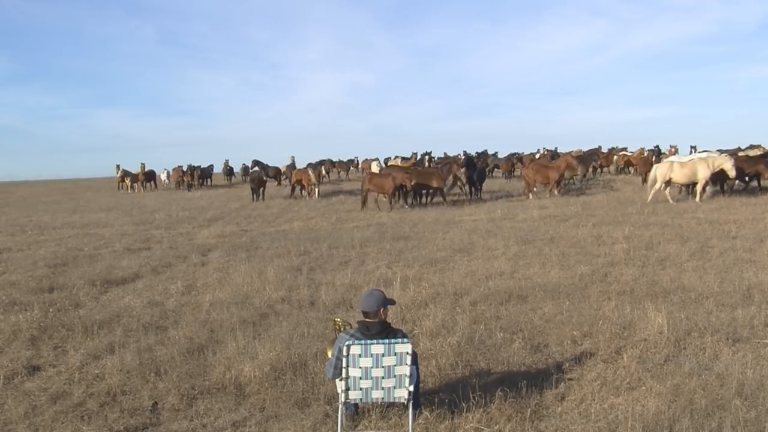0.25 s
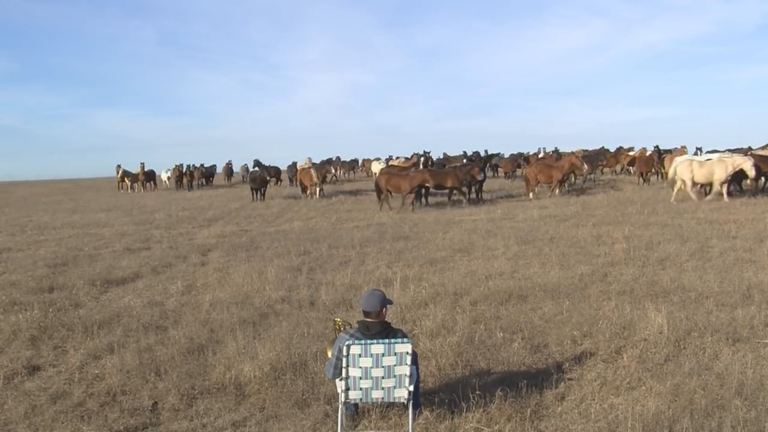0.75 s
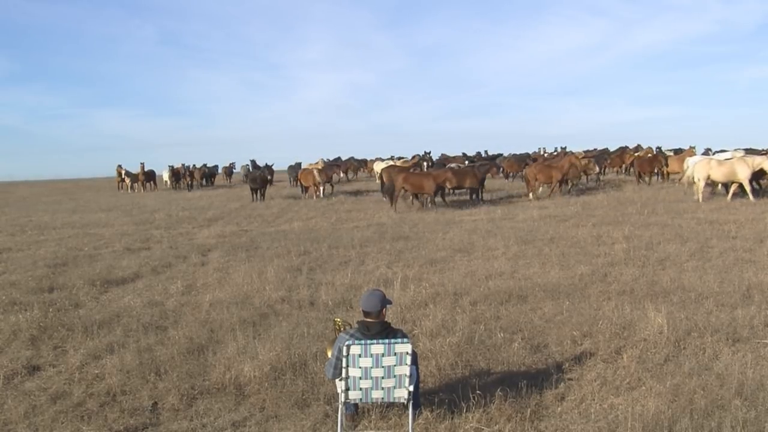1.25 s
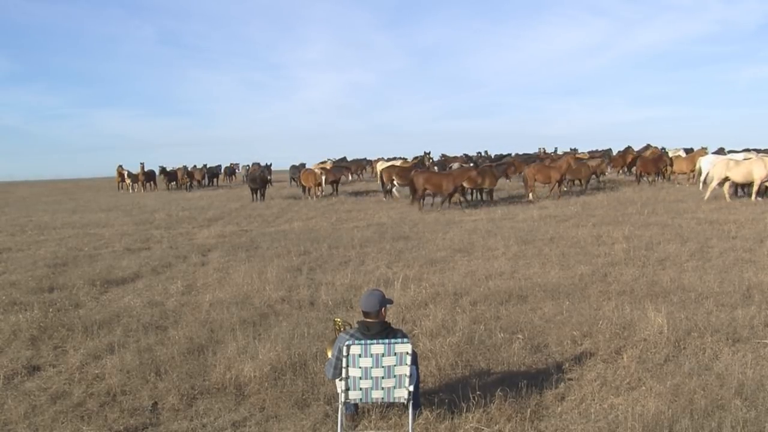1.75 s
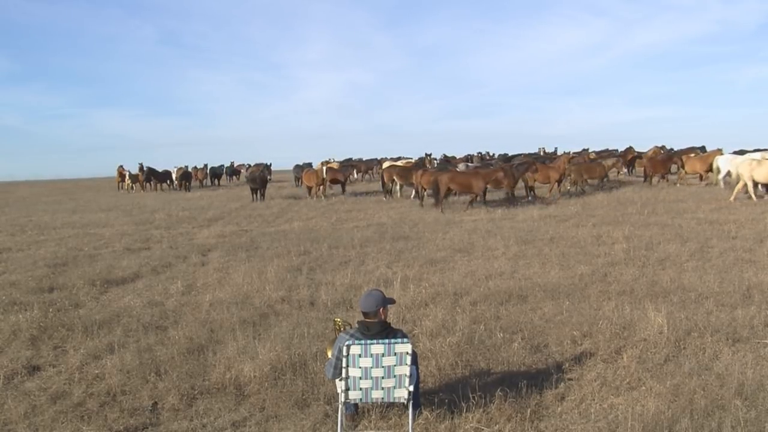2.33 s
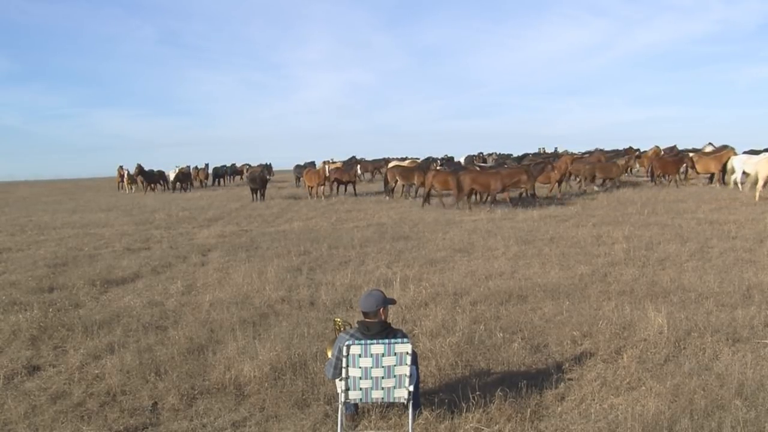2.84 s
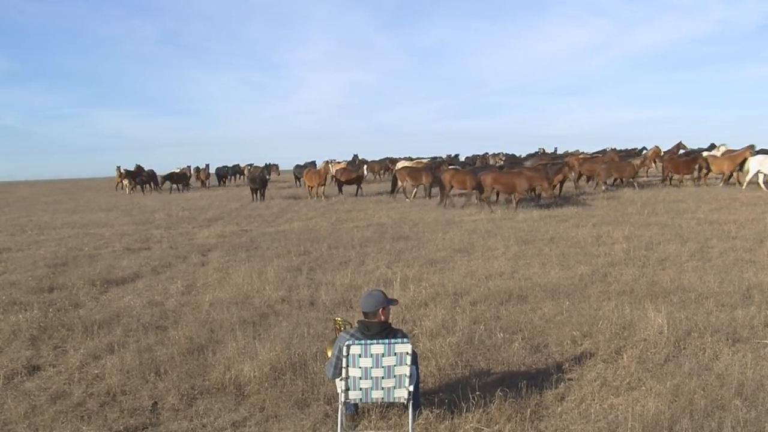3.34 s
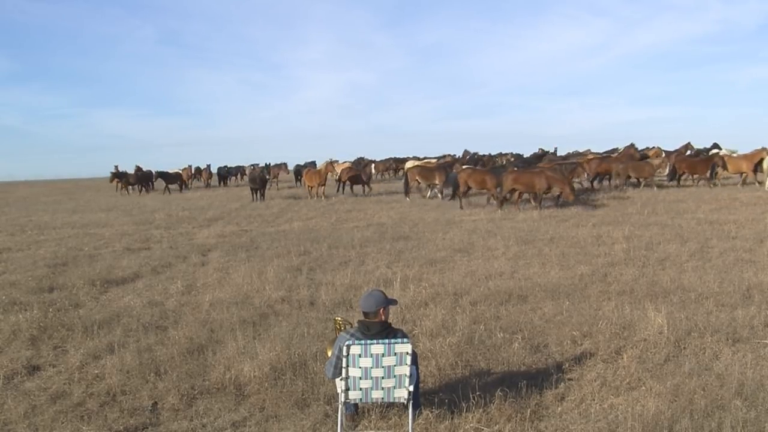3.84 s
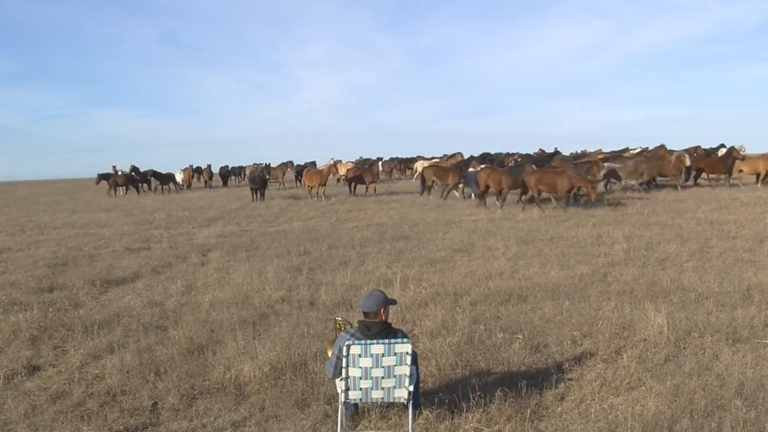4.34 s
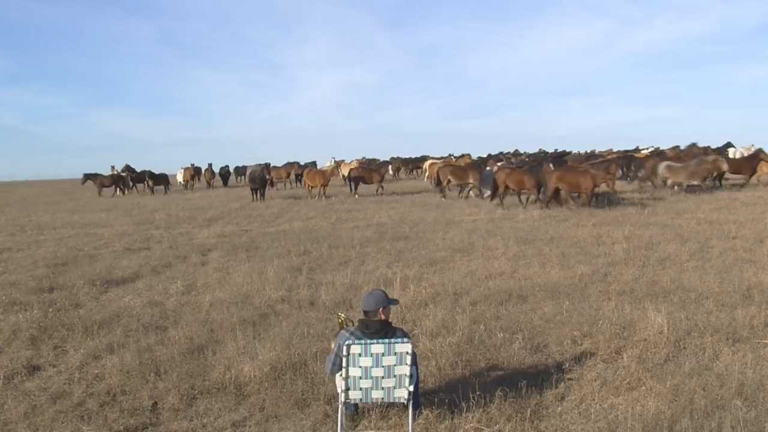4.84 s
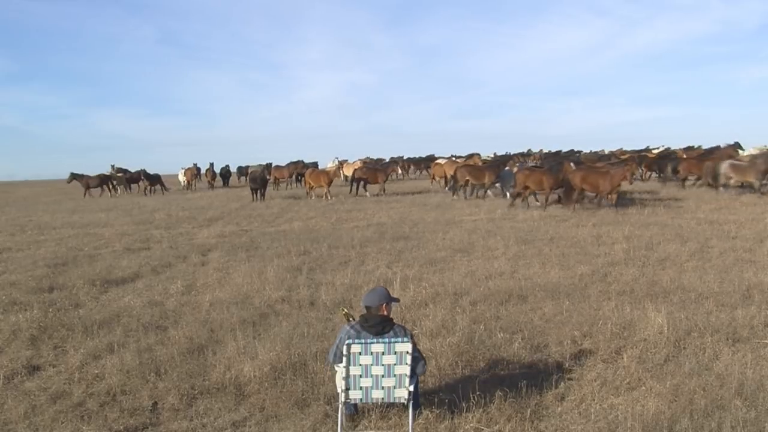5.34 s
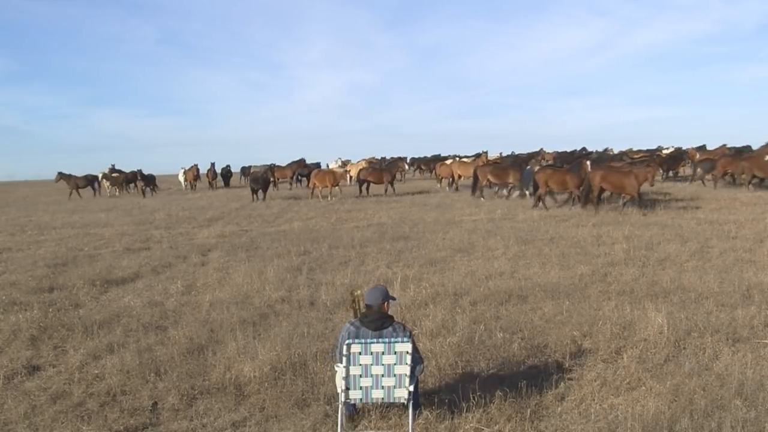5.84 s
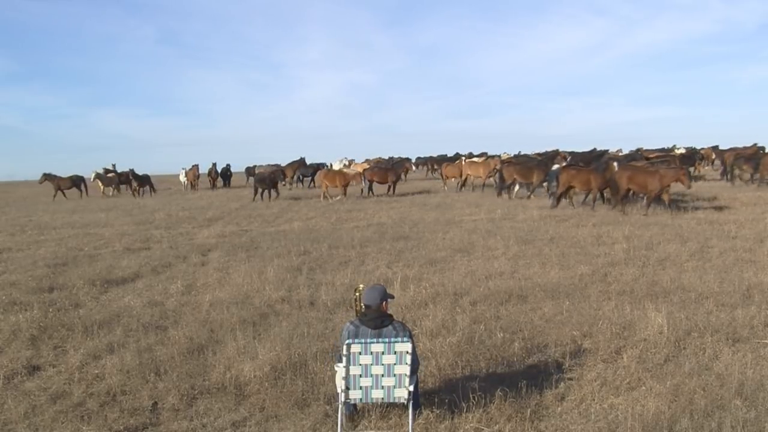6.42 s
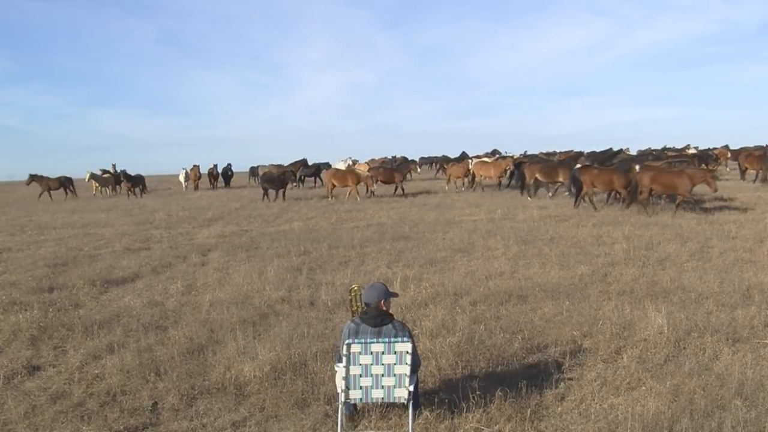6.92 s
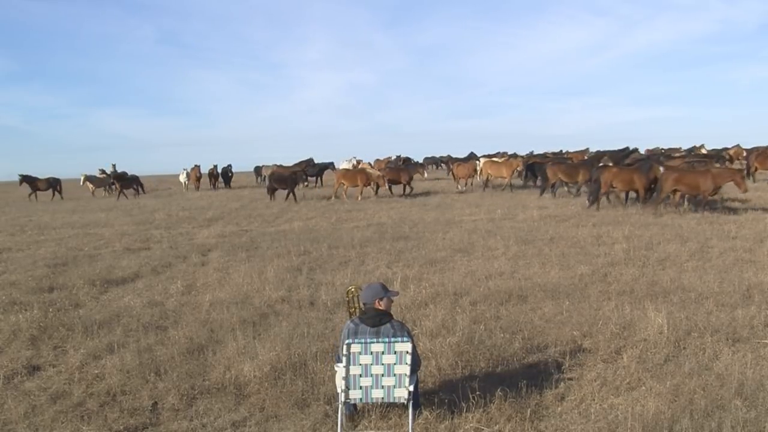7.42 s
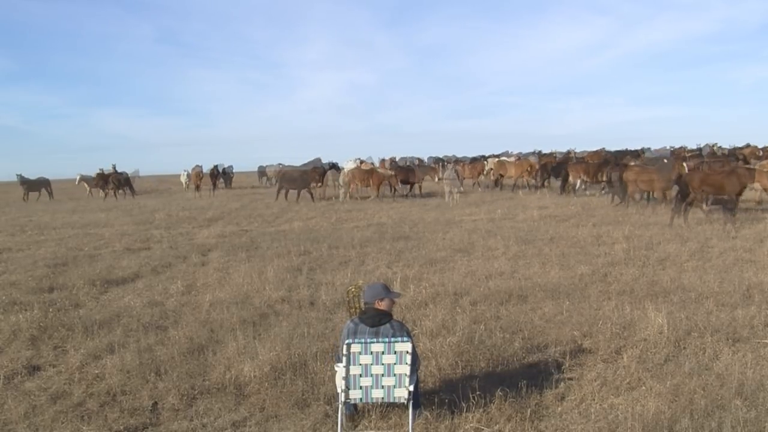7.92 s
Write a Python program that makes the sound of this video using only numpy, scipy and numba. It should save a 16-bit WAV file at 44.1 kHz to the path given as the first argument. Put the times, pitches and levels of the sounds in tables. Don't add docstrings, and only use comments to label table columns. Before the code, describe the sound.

A continuous dry swish of legs through grass, swelling and easing as a herd passes. Low wind thumps strike the microphone in the first three seconds. Far horses squeal and whinny in thin, shaky falsetto, then one near horse snorts hard, its nostrils flapping rapidly with wet, airy pops. Fainter flutters answer from farther off. Muffled hooves touch soft earth, stalks snap, and gusts come back last. Dry open air, nearly mono with slight width.

```python
import sys
import numpy as np
from scipy import signal
from scipy.fft import rfft, irfft, next_fast_len
from scipy.io import wavfile
from scipy.ndimage import uniform_filter1d
from numba import njit

SR = 44100
rng = np.random.default_rng(int(sys.argv[2]) if len(sys.argv) > 2 else 0)


def to_wav(sig):
    pcm = np.clip(np.atleast_2d(sig), -1, 1) * 32767
    pcm = np.round(pcm).astype(np.int16)
    wavfile.write(sys.argv[1], SR, pcm.T)


def magnitude_from_level(level_db):
    exponent = np.asarray(level_db, float) / 20
    return 10 ** exponent


N = 360297
T = np.arange(N) / SR


def level(x, db=0):
    return x * magnitude_from_level(db) / np.sqrt(np.mean(x ** 2))


def curves(rows):
    s, *columns = np.transpose(rows)
    return [np.interp(T, s, c) for c in columns]


@njit
def svf(x, warp, damp):
    y, b, l = np.empty(len(x)), 0., 0.
    for i in range(len(x)):
        g, k = warp[i], damp[i]
        v = (b + g * (x[i] - l)) / (1 + g * (g + k))
        b, l, y[i] = 2 * v - b, l + 2 * g * v, k * v
    return y


def band(x, hz, width_hz):
    warp = np.tan(np.pi * hz / SR) + 0 * x
    damp = width_hz / hz + 0 * x
    return svf(svf(x, warp, damp), warp, damp)


def walk(rate):
    k = int(SR / rate)
    steps = np.repeat(rng.standard_normal(N // k + 1), k)
    return 1.3 * uniform_filter1d(uniform_filter1d(steps, k), k)[:N]


def add(out, s, x):
    i = int(s * SR)
    out[i:i + len(x)] += x[:N - i]


def blip(db, hz, rise_s, fall_s, glide=0):
    t = np.arange(4096 if fall_s > .002 else 768) / SR
    shape = (1 - np.exp(-t / rise_s)) ** 2 * np.exp(-t / fall_s)
    return magnitude_from_level(db) * shape / shape.max() * np.sin(2 * np.pi * hz * t * (1 + glide * t / 2))


# start_s, length_s, level_db, centre_hz
GUSTS = [(0, 0.052, -48.5, 298), (0.205, 0.018, -43, 516), (0.592, 0.096, -47.5, 460),
         (0.692, 0.034, -34.5, 570), (0.766, 0.018, -35, 560), (0.783, 0.05, -41, 447),
         (0.837, 0.024, -41, 450), (0.931, 0.038, -44, 460), (1.008, 0.014, -41, 620),
         (1.023, 0.02, -42, 660), (1.097, 0.011, -36, 634), (1.107, 0.035, -35.5, 620),
         (1.191, 0.015, -46, 656), (1.142, 0.036, -48, 665), (1.242, 0.035, -45, 530),
         (1.286, 0.019, -50, 590), (1.444, 0.031, -49, 270), (1.476, 0.025, -49, 543),
         (1.734, 0.036, -46, 387), (1.768, 0.043, -38, 430), (1.843, 0.017, -52.5, 283),
         (1.912, 0.017, -49, 250), (1.958, 0.018, -51, 267), (2.006, 0.011, -36, 434),
         (2.017, 0.023, -39, 515), (2.219, 0.035, -46.5, 333), (2.354, 0.019, -60, 415),
         (2.499, 0.027, -59, 340), (2.534, 0.024, -42.5, 490), (2.568, 0.031, -47, 476),
         (2.594, 0.052, -42.5, 324), (2.65, 0.045, -43.5, 382), (2.768, 0.0083, -50.5, 650),
         (7.63, 0.065, -57.5, 300), (7.678, 0.075, -59, 300), (7.782, 0.032, -49.5, 398),
         (7.813, 0.046, -46, 397), (7.85, 0.081, -39.5, 376), (7.967, 0.022, -58, 500),
         (7.988, 0.038, -37, 450), (7.999, 0.044, -42.5, 640), (8.027, 0.051, -34, 554),
         (8.073, 0.022, -55, 500)]
# start_s, peak_db, centre_hz
THUMPS = [(0.688, -36, 724), (0.7, -33, 470), (0.77, -32, 563), (0.84, -38, 453), (0.597, -40, 700),
          (0.961, -43, 579), (1.012, -40, 514), (1.037, -34, 710), (1.097, -33, 620), (1.115, -30.5, 735),
          (1.196, -44, 695), (1.288, -42, 625), (1.761, -37, 340), (2.004, -33.5, 380), (2.016, -37, 610),
          (2.025, -35, 447), (1.745, -43, 533), (1.782, -37, 520), (2.242, -41.5, 456), (2.538, -40, 670),
          (2.653, -38, 300), (2.588, -37, 384), (7.836, -40, 345), (7.893, -37, 400), (7.985, -35, 390),
          (8.019, -37, 706), (8.043, -28, 526), (8.058, -29, 630)]
# time_s, rumble_db
BREEZE = [(0.0, -72), (0.45, -67), (0.86, -61), (1.14, -64), (1.5, -75.5), (1.77, -81), (1.91, -67),
          (2.32, -83), (2.6, -77.5), (2.98, -76.5), (3.21, -90.5), (4.1, -83.5), (4.4, -76.5), (4.9, -75.5),
          (5.5, -89), (7.4, -89.5), (7.9, -73), (8.17, -64.5)]


def wind():
    gain, hz = np.zeros(N), np.full(N, 400.)
    for s, length_s, db, centre_hz in GUSTS:
        arch = np.sin(np.linspace(0, np.pi, int(length_s * SR))) ** 0.38
        add(gain, s, magnitude_from_level(db - 7.5) * arch)
        hz[int(s * SR):] = centre_hz
    eddies = rng.standard_normal(N) * magnitude_from_level(2.2 * walk(260))
    edges = signal.butter(5, [170, 880], "band", fs=SR, output="sos")
    bursts = signal.sosfilt(edges, band(eddies, hz, 800))

    thumps = np.zeros(N)
    for s, db, centre_hz in THUMPS:
        add(thumps, s, blip(db - 3, centre_hz, .0005, .0028))

    rumble = level(band(rng.standard_normal(N) * magnitude_from_level(2.0 * walk(25)), 184, 237))
    sway = level(band(rng.standard_normal(N) * magnitude_from_level(2.0 * walk(15)), 49, 74))
    breeze_db = curves(BREEZE)[0]
    return level(bursts) * gain + thumps + magnitude_from_level(breeze_db + 6) * rumble + magnitude_from_level(1.2 * breeze_db + 11) * sway


# time_s, rustle_db
GRASS = [
    (0, -55.5),
    (.5, -56.5),
    (1.5, -54.5),
    (2.9, -56),
    (3.6, -52.5),
    (4.1, -52),
    (5.2, -51.5),
    (6, -53),
    (6.9, -54.5),
    (8.17, -55.5),
]
# frequency_hz, density_db (per Hz)
GRASS_COLOUR = [(150, -10), (250, -27.5), (413, -20), (620, -13.5), (850, -11.5), (1000, -9.5),
                (1450, -0.5), (1850, 0.5), (2600, -7), (4960, -16.5), (6210, -22), (8470, -19.5),
                (10200, -26.5), (12400, -26), (15500, -31)]
# time_s, swell_db, treble_swell_db
SWISHES = [(.25, 2.5, 3), (.62, 0.5, 1.5), (.75, 2.5, 0), (1.08, 1, 1), (1.38, 1, 0), (2.08, 1.5, 4.5),
           (2.5, 1, 2.5), (2.75, 1, 3), (3.1, 0.5, 4), (3.38, 3.5, 5), (5.33, 2.5, 1), (5.67, -1, 0.5),
           (5.82, 2.5, 1), (5.97, 0, 3), (6.3, 1.5, 2), (6.67, 4, 2.5), (7.1, 0.5, 2), (7.42, 0, 1),
           (7.67, 2.5, 0), (7.8, 1, 2.5), (8.04, 3, 2)]


def grass():
    swish_s, treble_below_db, wash_below_db = 0.093, -10.5, -17.5
    near_db = curves(GRASS)[0]
    swells = sum(np.outer(rise_db, np.exp(-((T - s) / swish_s) ** 2)) for s, *rise_db in SWISHES)
    rustle_db = near_db + swells[0]
    treble_db = treble_below_db + swells[1] - swells[0]

    colour_hz, colour_db = np.transpose(GRASS_COLOUR)
    size = next_fast_len(N)
    octave = np.log2(np.arange(1, size // 2 + 2) * SR / size)
    steps = walk(15)
    stalks = rfft(rng.standard_normal(N) * magnitude_from_level(0.82 * walk(400)), size)
    stalks *= magnitude_from_level(np.interp(octave, np.log2(colour_hz), colour_db, left=-90))
    dull, middle, treble = np.zeros(N), np.zeros(N), np.zeros(N)
    for hz in 210 * 2 ** np.arange(0, 6.6, .5):
        slice_ = np.clip(1 - 2 * abs(octave - np.log2(hz)), 0, 1)
        part = irfft(stalks * slice_, size)[:N] * magnitude_from_level(0.5 * steps + 0.4 * walk(15))
        if hz < 1000:
            dull += part
        elif hz < 3500:
            middle += part
        else:
            treble += part

    rustle = magnitude_from_level(rustle_db) * (level(middle, -1.54) + magnitude_from_level(treble_db) * level(treble, -2.24))
    wash = np.hypot(magnitude_from_level(near_db + wash_below_db), magnitude_from_level(curves(BREEZE)[0])) * level(dull, 0.64)
    return rustle + wash


# start_s, peak_db, pitch_hz
STALKS = [(0.055, -43.5, 1380), (0.189, -43, 2100), (0.2244, -53, 1520), (2.7666, -36.5, 1550),
          (3.0837, -43, 1510), (5.1858, -36, 1680), (5.5464, -35, 1790), (5.596, -38, 1770),
          (5.7155, -41, 1800), (6.522, -38.5, 1610), (3.401, -50, 6270), (3.494, -53, 7000),
          (7.2873, -51, 1490), (8.1355, -45, 1600)]


def snapped_stalks():
    out = np.zeros(N)
    for s, db, hz in STALKS:
        add(out, s, blip(db - 1.5, hz, .0005, .0013) + blip(db - 7, 3000, .0002, .0003))
    return out


def falsetto(rows, shake, flicker):
    span = slice(int(rows[0][0] * SR), int(rows[-1][0] * SR))
    hz, db, octave_db = (c[span] for c in curves(rows))
    shaken_hz = uniform_filter1d(hz, size=600) * (1 + 0.0069 * shake[span])
    phase = 2 * np.pi * np.cumsum(shaken_hz) / SR
    octave_gain = magnitude_from_level(octave_db + 1 + 3 * shake[span][::-1])
    tone = np.sin(phase) + octave_gain * np.sin(2 * phase + .8 * flicker[span])
    fades = signal.windows.tukey(len(hz), min(0.018 * SR / len(hz), 1))
    return np.sqrt(2) * fades * magnitude_from_level(db + 1.3 * flicker[span]) * tone


# start_s, length_s, from_hz, to_hz, peak_db
SQUEALS = [(0.283, 0.084, 1294, 1294, -62), (0.354, 0.059, 1140, 1300, -60),
           (0.938, 0.043, 1445, 1600, -53), (1.049, 0.047, 1593, 1580, -48.5),
           (1.712, 0.065, 1450, 1700, -58), (3.148, 0.061, 1260, 1335, -56), (3.223, 0.04, 1330, 1410, -58),
           (3.883, 0.041, 1660, 1705, -52), (3.929, 0.095, 238, 200.6, -75),
           (6.642, 0.065, 1194, 1013, -58), (7.271, 0.035, 1515, 1480, -53.5)]


def squeals(shake, flicker):
    out = np.zeros(N)
    for s, length_s, from_hz, to_hz, db in SQUEALS:
        rows = [(s + share * length_s, from_hz + share * (to_hz - from_hz), db + edge_db, -30)
                for share, edge_db in [(0, -5.5), (0.38, 0), (1, -5.5)]]
        add(out, rows[0][0], falsetto(rows, shake, flicker))
    return out


def trill(pulses, octaves_db, climb_s, hold_s, fall_s):
    low_s, low_hz, low_db = 0, .94 * pulses[0][1], pulses[0][2] - 14
    rows = []
    for (s, hz, db, valley_hz, valley_db), octave_db in zip(pulses, octaves_db):
        valley_octave_db = octave_db - 4
        if s - hold_s - climb_s > low_s:
            climb_start_s = s - hold_s - climb_s / (1 if rows else 2)
            rows.append((climb_start_s, low_hz, low_db, valley_octave_db))
        low_s, low_hz, low_db = s + fall_s, valley_hz, valley_db
        rows.append((s - hold_s, hz * (1 - .008), db - 4, octave_db))
        rows.append((s, hz, db, octave_db))
        rows.append((low_s, low_hz, low_db, valley_octave_db))
    return rows


# crest_end_s, pitch_hz, level_db, valley_hz, valley_db
FIRST_WHINNY = [
    (1.156, 1865, -50, 1738, -56),
    (1.238, 1878, -55, 1884, -59),
    (1.294, 1888, -53, 1760, -59),
    (1.397, 1900, -43.5, 1830, -61),
    (1.517, 1884, -44, 1790, -67),
    (1.64, 1846, -49, 1740, -66),
]
SECOND_WHINNY = [
    (3.31, 1590, -48, 1545, -53),
    (3.426, 1715, -50, 1585, -59),
    (3.545, 1735, -47, 1612, -55),
    (3.668, 1758, -46, 1598, -55),
    (3.795, 1745, -51, 1660, -66),
]
HIGH_WHINNY = [
    (3.305, 2130, -59, 1990, -55),
    (3.415, 2280, -53, 2070, -54),
    (3.485, 2050, -57, 2000, -68),
]
WHINNY_LOW = [
    (3.29, 527, -77, 445, -73),
    (3.4, 589, -74, 483, -75),
    (3.51, 528, -86, 440, -90),
    (3.62, 597, -70, 487, -77),
    (3.78, 525, -77, 437, -73),
    (3.9, 514, -71, 430, -73),
]


def whinnies(shake, flicker):
    out = np.zeros(N)
    for rows in [trill(FIRST_WHINNY, [-32] * 6, climb_s=.026, hold_s=.024, fall_s=.025),
                 trill(SECOND_WHINNY, [-17, -7, -12, -12, -14], climb_s=.04, hold_s=.032, fall_s=.028),
                 trill(HIGH_WHINNY, [-30] * 3, climb_s=.04, hold_s=.025, fall_s=.03),
                 trill(WHINNY_LOW, [-30] * 6, climb_s=.04, hold_s=.015, fall_s=.05)]:
        add(out, rows[0][0], falsetto(rows, shake, flicker))
    return out


# start_s, peak_db, pitch_hz
THUDS = [(2.888, -53.5, 220), (3.223, -61, 263), (3.445, -68, 180), (3.575, -65, 220), (3.614, -60, 262),
         (4.065, -65, 180), (4.14, -67, 165), (4.207, -68, 378), (4.327, -60, 218), (4.738, -64, 348),
         (5.442, -64, 204), (5.519, -63, 172), (5.575, -59, 294), (6.097, -56, 262), (6.118, -61, 170),
         (6.415, -60, 196), (6.452, -57, 160), (6.643, -62, 260), (6.71, -64, 215), (6.858, -61, 272),
         (6.908, -58, 223), (7.007, -61, 194), (7.156, -63, 192), (7.21, -67, 200), (7.352, -66, 200),
         (7.315, -65, 365)]


def hooves():
    out = np.zeros(N)
    for s, db, hz in THUDS:
        add(out, s, blip(db - 1.5, hz, 0.0015, 0.0059))
    return out


# start_s, peak_db, pitch_hz
LEAD_FLAPS = [
    (4.0065, -45, 2590),
    (4.0424, -41.5, 1670),
    (4.045, -41.5, 2320),
    (4.0751, -40, 1680),
    (4.1204, -37.5, 2210),
    (4.1633, -33, 2020),
]
# start_s, peak_db, pitch_hz
FAR_FLAPS = [(5.296, -59, 840), (5.324, -51, 899), (5.352, -51, 829), (5.382, -48, 830),
             (5.415, -46.5, 855), (5.441, -50, 730), (5.465, -48, 725), (5.483, -49, 877),
             (5.517, -51, 724), (5.546, -49, 780), (5.569, -47, 773), (5.594, -47, 711), (5.615, -49, 830),
             (5.649, -51, 770), (5.681, -53, 770), (5.715, -47, 756), (5.749, -47, 880),
             (5.783, -46.5, 740), (5.821, -50, 821), (5.858, -47, 807), (5.973, -48.5, 816),
             (6.002, -49, 820), (6.031, -53, 684), (6.085, -53, 751)]


def far_snorts():
    out, puff_gain = np.zeros(N), np.zeros(N)
    for s, db, hz in LEAD_FLAPS + FAR_FLAPS:
        add(out, s, blip(db - 2, hz, 0.0008, 0.003))
        add(out, s, blip(db - 15, min(2.1 * hz, 4000), 0.0003, 0.0008))
        add(puff_gain, s, blip(db, 31, 0.0045, 0.024))
    return out + magnitude_from_level(-9.5) * puff_gain * level(band(rng.standard_normal(N), 1590, 1400))


# start_s, snap_peak_db, low_pop_db
OPENS = [(4.1964, -40, -36), (4.2175, -23, -27), (4.242, -22, -61), (4.2764, -42, -56), (4.3106, -53, -52),
         (4.3455, -20, -22), (4.383, -20.5, -25), (4.4197, -18, -38), (4.4556, -20, -27), (4.492, -21, -39),
         (4.531, -19, -45), (4.5683, -13, -47), (4.6076, -17.5, -59.5), (4.6458, -17, -59),
         (4.6875, -21, -35), (4.7282, -29, -39), (4.774, -24, -34), (4.8184, -24.5, -29),
         (4.866, -22.5, -40), (4.9142, -27, -28), (4.9645, -26.5, -23), (5.0194, -36, -33)]
# start_s, peak_db, pitch_hz
SHUTS = [(4.2049, -19, 1240), (4.229, -32, 1380), (4.2623, -35, 1350), (4.2992, -5.5, 1545),
         (4.3315, -11, 1540), (4.369, -8, 1740), (4.4048, -11.5, 1424), (4.4421, -10, 1720),
         (4.4785, -6.5, 1630), (4.5173, -9.5, 1645), (4.554, -21, 1510), (4.5948, -10.5, 1725),
         (4.6336, -19, 1565), (4.6744, -37, 1520), (4.709, -17, 1370), (4.756, -21, 1420),
         (4.801, -22, 1430), (4.846, -30, 1350), (4.8964, -40, 2010), (4.9489, -30, 1860),
         (5.0012, -39, 1750), (5.0587, -30, 1450)]
SWELLS = [-29.5, -25.5, -28.5, -54, -42, -40, -31, -31, -41, -32, -32.5, -31, -32.5, -33.5, -27, -33, -36,
          -34, -41, -40.5, -47, -52]
# time_s, level_db, upper_hz, rasp_db, steady_db, lateness (power of the climb)
BLOW = [
    (4.18, -59, 2580, -1, -4, 2.4),
    (4.2, -36, 2700, -4, 0, 2.1),
    (4.3, -29, 2950, -5, 2.5, 2),
    (4.45, -30.5, 3580, 1, -0.5, 1.85),
    (4.65, -32.5, 3750, -4, 6, 1.4),
    (4.8, -32, 2530, -6, 0.5, 1.75),
    (4.92, -34, 2330, -11, 0, 1.9),
    (5.0, -38, 2360, -8, 0.5, 2.7),
    (5.1, -53.5, 2450, -8, 0, 1.5),
]
# open_hz, shut_hz, width_hz, level_db
NOSE_BRIGHT = [
    (6000, 5000, 1100, -14.5),
    (7600, 8200, 1600, -17),
]


def snort():
    start_s, end_s = BLOW[0][0], BLOW[-1][0]
    span = slice(int(start_s * SR), int(end_s * SR))
    blow_db, upper_hz, rasp_db, steady_db, lateness = (c[span] for c in curves(BLOW))
    bright_db = -9.5 + 18 * np.exp(-(T[span] - start_s) / 0.061)
    knots = np.sort(np.r_[[o[0] for o in OPENS], [s[0] + .005 for s in SHUTS]])
    turn = np.interp(T[span], knots, np.arange(len(knots))) % 2
    is_open = turn < 1
    narrow = np.minimum(turn, 1) ** np.maximum(lateness, .5)
    gate = uniform_filter1d(np.where(is_open, magnitude_from_level(4 * turn - 10), magnitude_from_level(2 * turn - 15)), size=80)
    air = (rng.standard_normal(N) * magnitude_from_level(1.97 * walk(250)))[span]
    upper_air = air[::-1]

    def tract(flow, open_hz, shut_hz, width_hz):
        return level(band(flow, open_hz + (shut_hz - open_hz) * narrow, width_hz))

    upper = tract(upper_air, 0.91 * upper_hz, 1.07 * upper_hz, 650)
    for open_hz, shut_hz, width_hz, db in NOSE_BRIGHT:
        upper += magnitude_from_level(db) * tract(upper_air, open_hz, shut_hz, width_hz)
    upper = level(upper)
    lift_hz = .6 * np.maximum(3700 - upper_hz, 0)
    rasp_gain = uniform_filter1d(np.where(is_open, 0.3 + 0.81 * np.sin(np.pi * turn ** 2), 0.3), size=80)
    upper += magnitude_from_level(rasp_db) * rasp_gain * tract(upper_air, 3650 + lift_hz, 4250 + lift_hz, 950)

    climbing = tract(air, 840, 1900, 380)
    steady = tract(air, 1550, 1700, 560)
    out = np.zeros(N)
    out[span] = magnitude_from_level(blow_db) * gate * (climbing + magnitude_from_level(steady_db - 1) * steady + magnitude_from_level(bright_db) * upper)

    edges = rng.standard_normal((len(OPENS), 2))
    for (s, db, pop_db), (shine, bite) in zip(OPENS, edges):
        snap = blip(db - 4.5, 1700, 0.00028, 0.00058)
        snap += blip(db - 10.5, 2890, 0.00038, 0.00051)
        snap += blip(db - 10, 3810, 0.00032, 0.00054)
        snap += blip(db - 25 + 5 * bite, 5300, 0.00021, 0.00053)
        snap += blip(db - 24 + 5 * shine, 8110, 0.0002, 0.00048)
        add(out, s + 0.000953, snap)
        add(out, s + 0.00082, blip(pop_db - 12.5, 750, 0.00016, 0.0054))

    squirts, swells, jet_hz = np.zeros(N), np.zeros(N), np.zeros(N)
    swell_s = 0.0095
    for (s, db, hz), swell_db in zip(SHUTS[::-1], SWELLS[::-1]):
        jet_hz[:int((s + .012) * SR)] = hz
        ahead = T[span] - s - .002
        swells[span] += magnitude_from_level(swell_db) * np.exp(-(ahead / np.where(ahead < 0, swell_s, swell_s / 2)) ** 2)
        squirt = blip(db - 6.5, 1.03 * hz, .0011, .0015, glide=-12)[::-1]
        add(squirts, s + 0.004176 - len(squirt) / SR, squirt)
    out += squirts * magnitude_from_level(1.5 * walk(900))
    out[span] += swells[span] * level(band(air, np.maximum(jet_hz[span], 1200), 380))

    out = signal.sosfilt(signal.butter(6, 660, "high", fs=SR, output="sos"), out)
    out[span] += magnitude_from_level(blow_db - 34) * level(gate * band(upper_air, 470, 290))
    return out


# start_s, length_s, level_db, from_hz, to_hz
PUFFS = [
    (6.633, 0.091, -54.5, 1240, 1050),
    (6.64, 0.075, -51.5, 1770, 1620),
    (6.646, 0.051, -57, 2340, 2200),
]


def puffs():
    out, air = np.zeros(N), rng.standard_normal(N)
    for s, length_s, db, from_hz, to_hz in PUFFS:
        k = int(length_s * SR)
        breath = band(air[int(s * SR):][:k], np.linspace(from_hz, to_hz, k), 320)
        add(out, s, magnitude_from_level(db) * np.hanning(k) * level(breath))
    return out


def scene():
    shake, flicker = walk(150), walk(70)
    out = wind() + grass() + snapped_stalks()
    out += squeals(shake, flicker) + whinnies(shake, flicker)
    out += hooves() + far_snorts() + snort() + puffs()
    return np.tile(out, (2, 1))


def low_pass(x):
    return signal.sosfilt(signal.butter(12, 15700, fs=SR, output="sos"), x)


WIDEN = [
    (490, -.13, 0),
    (758, 0, .21),
    (1302, 0, .03),
]


def record(dry):
    x = signal.sosfilt(signal.butter(2, 130, "high", fs=SR, output="sos"), dry)
    dip_s, dip_length_s = 8.125, 0.0051
    x = x * (1 - 0.76 * np.exp(-((T - dip_s) / dip_length_s) ** 2))
    wide = x.copy()
    for late, left, right in WIDEN:
        wide += np.array([[left], [right]]) * np.roll(x, late, axis=1)
    hiss = level(band(rng.standard_normal(N), 13900, 2000), -92)
    wide += hiss * np.array([[1], [-1]])
    wide = signal.sosfilt(signal.ellip(10, .2, 70, 15600, fs=SR, output="sos"), wide)
    return low_pass(wide)


dry = scene()
out = record(dry)
to_wav(out)
```